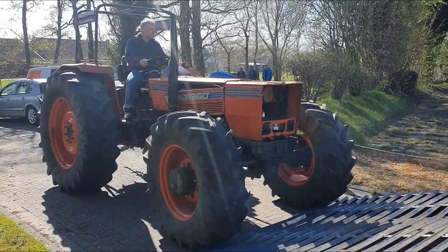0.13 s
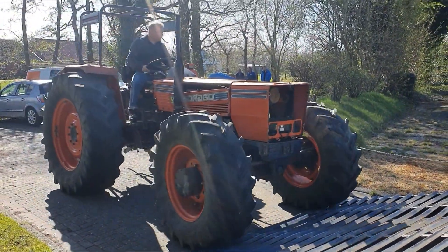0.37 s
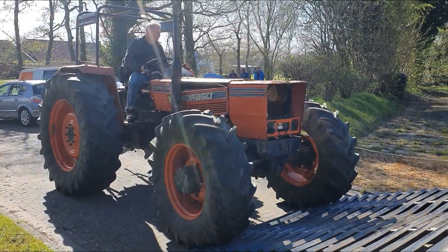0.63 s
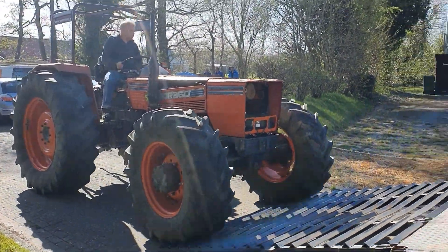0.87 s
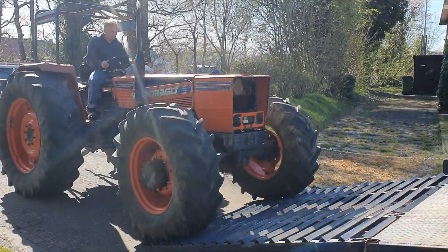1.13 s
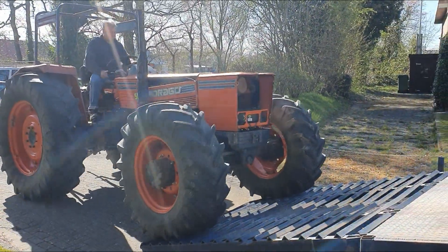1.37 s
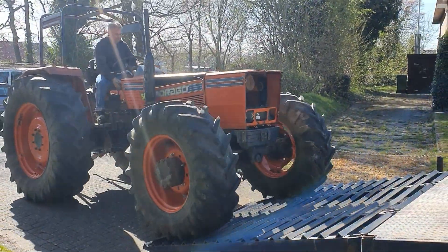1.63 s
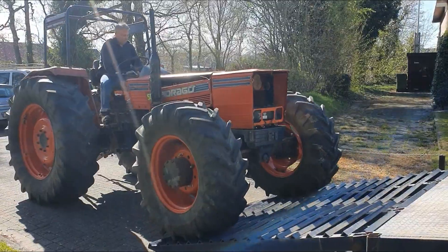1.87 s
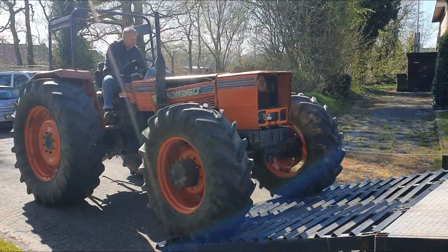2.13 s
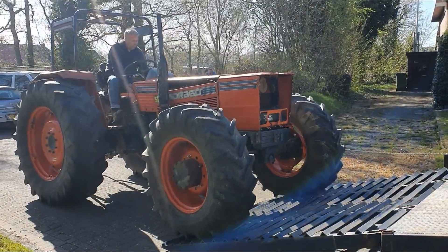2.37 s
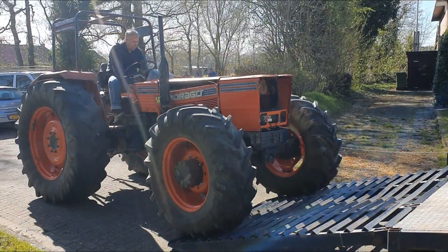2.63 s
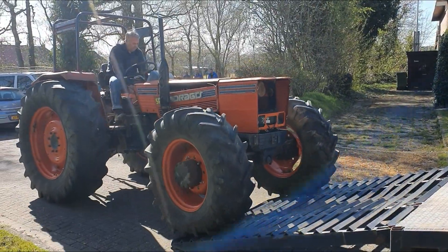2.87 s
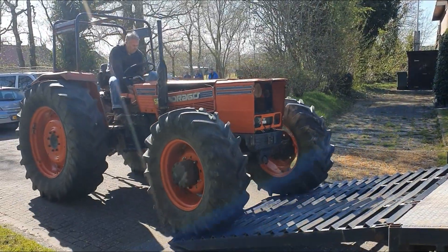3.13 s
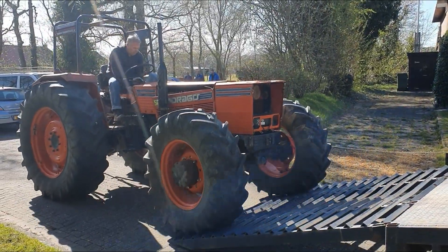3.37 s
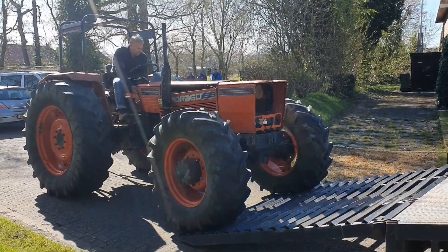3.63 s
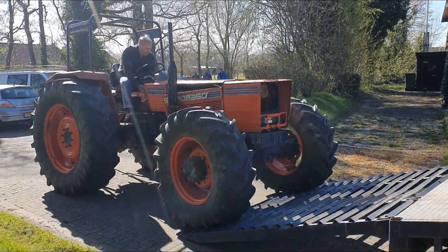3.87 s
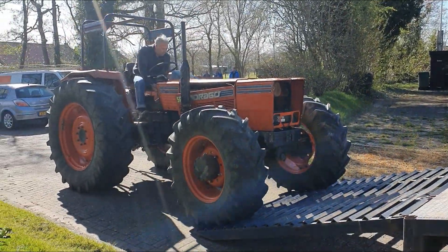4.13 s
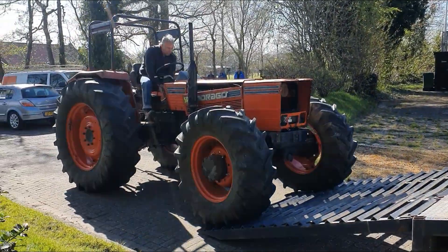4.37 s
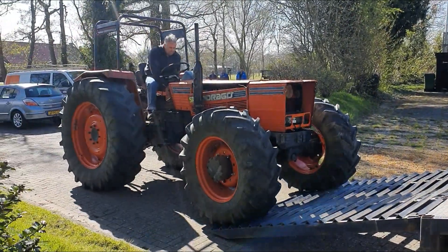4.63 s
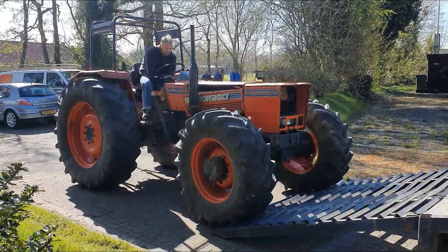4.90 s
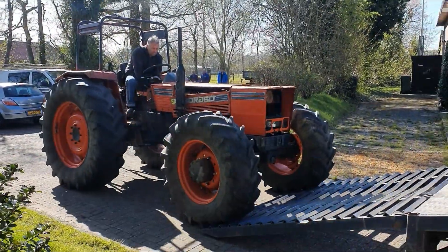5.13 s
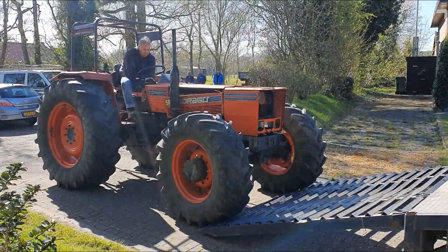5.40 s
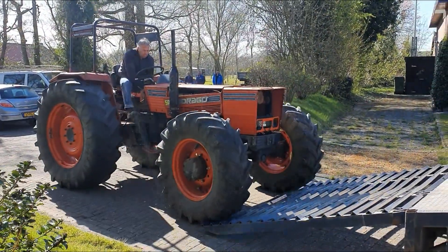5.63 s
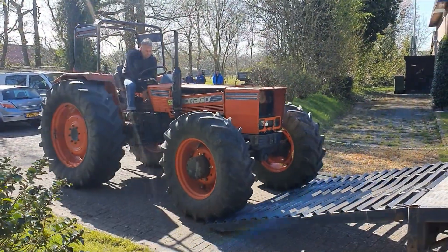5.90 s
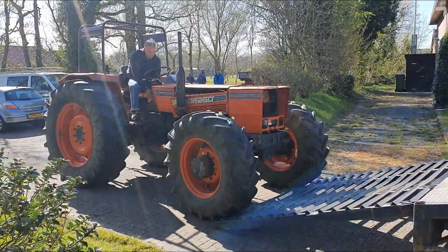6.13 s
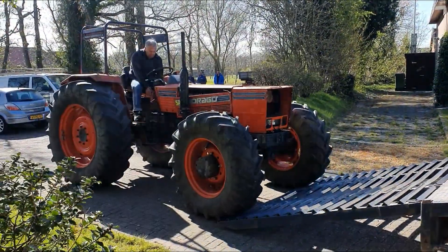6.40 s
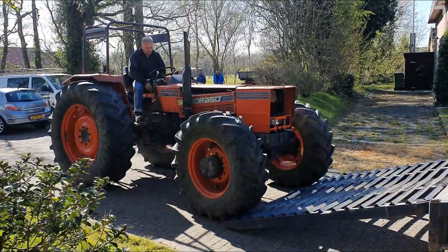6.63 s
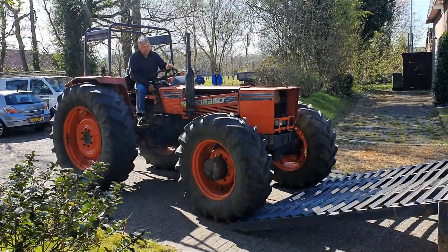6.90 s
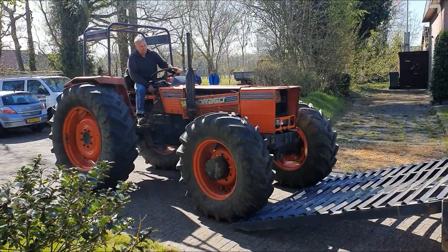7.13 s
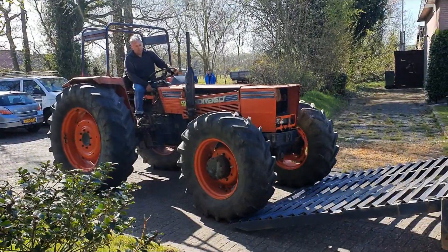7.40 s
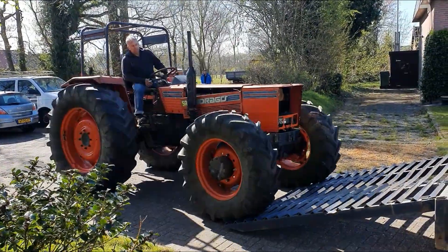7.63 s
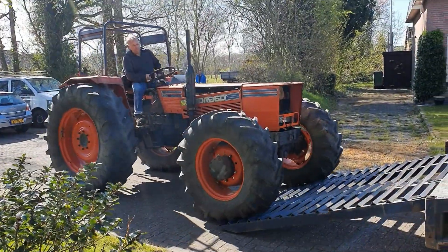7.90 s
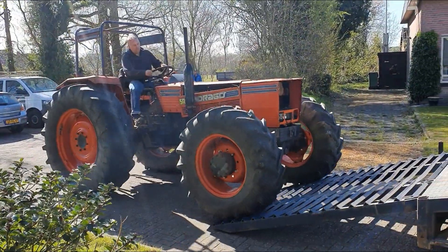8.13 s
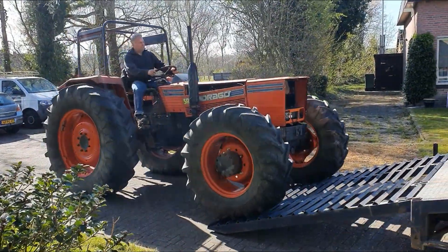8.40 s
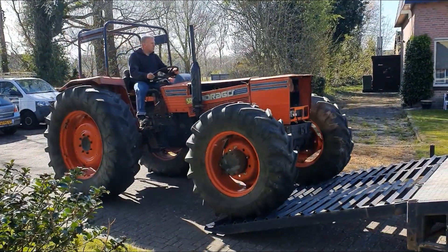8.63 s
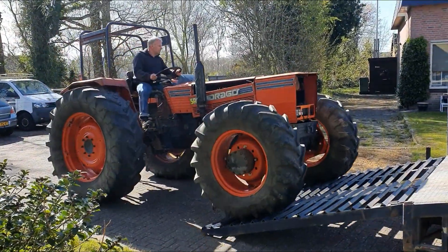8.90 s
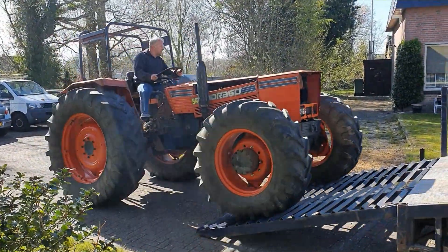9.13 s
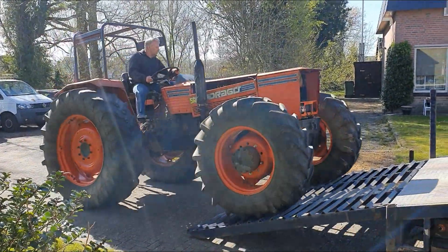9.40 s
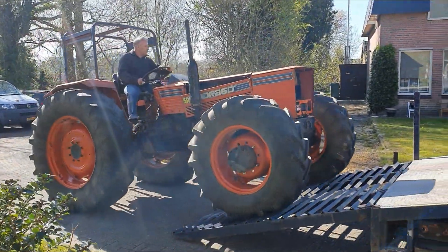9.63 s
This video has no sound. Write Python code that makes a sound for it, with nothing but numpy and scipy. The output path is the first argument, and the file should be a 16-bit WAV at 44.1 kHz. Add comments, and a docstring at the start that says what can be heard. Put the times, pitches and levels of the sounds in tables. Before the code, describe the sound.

A close, rough diesel engine runs throughout in an open yard, dry and without echo. Wind thuds strongly against the microphone early, then only now and then. Revs sag gradually past the middle; sheet metal hums. Around three quarters through, a lug jolts the steel ramp with a quick hard clatter and rustling scrape, and the engine surges, its low exhaust tone growing fuller as the tractor climbs.

```python
"""At a steel ramp in the open, a few metres from a hand-held phone, a six-cylinder diesel tractor idles down,
then pulls up the ramp. Each firing is a noise burst through casting modes, one cylinder harder than the next;
the exhaust booms as sines on the firing rate and its octave, panels hum as wavering tones, valves ring briefly.
Wind buffets the two microphone ports as low noise and single swings; steel blows ring as decaying modes, and
something rustles close by in swells of filtered noise."""
import sys
import numpy as np
from scipy import signal
from scipy.fft import rfft, irfft, next_fast_len
from scipy.io import wavfile
from scipy.ndimage import uniform_filter1d

SR = 44100
rng = np.random.default_rng(int(sys.argv[2]) if len(sys.argv) > 2 else 0)


def dump(signal):
    """Clip the signal to [-1, 1] and save it as 16-bit WAV at the path in sys.argv[1]."""
    limited = np.clip(np.atleast_2d(signal).T, -1, 1)
    pcm = np.round(limited * 32767).astype(np.int16)
    wavfile.write(sys.argv[1], SR, pcm)


def ratio_of_db(decibels):
    """Turn decibels (scalar or array-like) into linear amplitude factors; 0 dB maps to 1."""
    return 10 ** (np.asarray(decibels, float) / 20)


N = 430842
SIZE = next_fast_len(N)
FREQ = np.maximum(np.fft.rfftfreq(SIZE, 1 / SR), 1)
TIME = np.arange(N) / SR


def columns(table):
    """Each column of a curve table, interpolated at every sample."""
    seconds, *values = np.transpose(table)
    return [np.interp(TIME, seconds, value) for value in values]


def over_freq(table):
    """A (Hz, value) table at every frequency bin, interpolated over log frequency."""
    hz, value = np.transpose(table)
    return np.interp(np.log(FREQ), np.log(hz), value)


def shape(x, gain):
    """Filter by a gain per frequency bin, then scale to rms 1."""
    y = irfft(rfft(x, SIZE) * gain, SIZE)[..., :N]
    return y / np.sqrt(np.mean(y ** 2))


def walk(rate):
    """A random curve: normal draws held for 1 / rate seconds, then smoothed twice."""
    hold = int(SR / rate)
    steps = np.repeat(rng.standard_normal(N // hold + 1), hold)
    return uniform_filter1d(uniform_filter1d(steps, hold), hold)[:N]


def swells(rows, rest_db):
    """Level in dB: a resting level with bell-shaped swells (s, dB, length s) added in power."""
    power = ratio_of_db(rest_db) ** 2
    for start, db, length in rows:
        power = power + ratio_of_db(db) ** 2 * np.exp(-((TIME - start) / length) ** 2)
    return 10 * np.log10(power)


def resonance(hz, width):
    """Power gain of one steep resonance; width is nominal, in Hz."""
    return 1 / (1 + ((FREQ - hz * hz / FREQ) / (2.44 * width)) ** 2) ** 2


def modes(power):
    """The causal (minimum-phase) response with this power gain, from the folded cepstrum."""
    cepstrum = irfft(np.log(power) / 2, SIZE)
    cepstrum[1:SIZE // 2] *= 2
    cepstrum[SIZE // 2 + 1:] = 0
    return np.exp(rfft(cepstrum))


# Wind strength between the gusts. Each row: time in seconds, level in dB.
BREEZE = [(0.0, -29), (1.9, -30), (2.5, -34), (3.0, -33), (3.6, -33.5), (4.5, -33), (5.3, -38), (6.5, -40),
          (7.0, -40), (7.7, -33), (8.5, -36), (9.77, -35)]
# Gusts. Each row: centre in seconds, level in dB, length in seconds, left minus right in dB.
GUSTS = [(0.326, -21.5, 0.041, 1), (0.6, -27, 0.048, -5), (0.878, -24, 0.027, 6), (1.09, -25, 0.048, 4),
         (1.352, -19, 0.021, 1), (1.796, -21.5, 0.021, -7), (1.92, -22.5, 0.072, 1),
         (3.535, -25, 0.036, -1), (4.2, -32, 0.013, 0), (6.14, -29.5, .04, 0), (6.747, -32.5, 0.068, 0),
         (6.975, -31, .05, 0), (7.206, -25.5, 0.014, 0), (7.612, -27, 0.084, 5), (8.749, -31, 0.056, -2),
         (9.576, -41, .06, -7)]
# Colour of the turbulence. Each row: frequency in Hz, relative density in dB per Hz.
WIND_COLOUR = [(20, -15), (40, -10), (65, 2), (100, 2.5), (140, -10.5), (250, -15.5), (450, -39),
               (900, -69)]
WIND_SHARED = 0.57  # share of the noise power common to both ports
BREEZE_SHARED_DB, BREEZE_OWN_DB = 3, 3.5  # unsteadiness common to the ports, and of each port, before smoothing


def wind():
    """Low turbulence, partly shared by the ports; it flutters, and strong gusts slap higher."""
    shared, left, right = rng.standard_normal((3, N))
    noise = np.sqrt(WIND_SHARED) * shared + np.sqrt(1 - WIND_SHARED) * np.array([left, right])
    breeze_db = columns(BREEZE)[0] + BREEZE_SHARED_DB * walk(13)
    port_db = []
    for side in (1, -1):
        rows = [(start, db + side * pan_db / 2, length) for start, db, length, pan_db in GUSTS]
        port_db.append(swells(rows, breeze_db + BREEZE_OWN_DB * walk(16)))
    gust_db = np.array(port_db) + 1.83 * walk(30)  # flutter common to both ports
    rumble = ratio_of_db(gust_db) * shape(noise, ratio_of_db(over_freq(WIND_COLOUR)))
    # the slap grows almost twice as fast in dB as the rumble
    slap = ratio_of_db(1.91 * gust_db + 5.5) * shape(noise, np.sqrt(resonance(340, 124)))
    return rumble + slap


# Single slaps of wind. Each row: start in seconds, level in dB, pitch in Hz, left minus right in dB.
BUFFETS = [(0.071, -14, 99.5, 0), (0.238, -13.5, 102, -2), (0.315, -11.5, 72.4, -1.5),
           (0.35, -13.5, 76, -1), (0.5, -23, 74.5, 0), (0.535, -17, 76, -1), (0.791, -20, 77.6, 3),
           (1.195, -13, 76.5, 0), (0.624, -19, 80, -1.5), (0.748, -19, 81.4, 1.5), (0.911, -10.5, 81, -1.5),
           (1.061, -16, 87, -2), (1.15, -13.5, 71.6, 0), (1.323, -14.5, 105, 1), (1.335, -19.5, 200, 0),
           (1.9, -21, 150, 0), (0.245, -19, 165, 2), (1.433, -12, 68.4, 0), (1.489, -13.5, 76, 0),
           (1.56, -19, 101, -2), (1.648, -18, 80, -2.5), (1.799, -11, 60.7, 0), (1.882, -15.5, 64, 1),
           (1.949, -22, 114, 4), (2.03, -21, 63.5, 9), (2.129, -18, 72.7, 1), (2.341, -21, 70.5, -2),
           (3.029, -28, 87.5, -5), (3.167, -27.5, 109, -3.5), (3.512, -19, 86.5, 4),
           (3.631, -21, 69.6, -1.0), (3.77, -16.5, 83, 4), (3.899, -19, 61.9, 2), (4.131, -21, 72, 4),
           (4.42, -25, 90, 2.5), (6.89, -19, 70.4, 0), (7.24, -23, 70, 0), (8.701, -27, 80, 2)]
BUFFET_S, BUFFET_EDGE_DB = 0.042, -8.5  # length; strength of the swing an octave up


def buffets():
    """Single eddies slap the ports: a few soft low swings each."""
    starts = rng.uniform(0, 2 * np.pi, (len(BUFFETS), 2))
    age = np.arange(int(BUFFET_S * SR)) / SR
    envelope = np.sin(np.pi * (age / age[-1]) ** 0.76) ** 2
    out = np.zeros((2, N))
    for (s, db, hz, pan_db), (start, lag) in zip(BUFFETS, starts):
        swing = np.cos(2 * np.pi * hz * age + start + np.array([[0], [0.35 * lag]]))
        swing = swing + ratio_of_db(BUFFET_EDGE_DB) * (2 * swing ** 2 - 1)
        level = ratio_of_db(db + np.array([[pan_db], [-pan_db]]) / 2)
        first = int(s * SR)
        out[:, first:first + len(age)] += swing * envelope * level
    return out


# Rustles, scrapes and short low swells.
# Each row: centre in seconds, level in dB, length in seconds, centre in Hz, bandwidth in Hz (held to 40-20000).
RUSTLES = [(0.36, -45, .05, 4970, 6000), (0.584, -32, 0.02, 5200, 8500), (0.653, -40, 0.065, 5800, 7000),
           (0.86, -37, 0.021, 5100, 7500), (7.377, -30, 0.049, 1530, 1000), (7.33, -40, 0.036, 3400, 1200),
           (7.385, -39, 0.014, 3800, 6000), (7.44, -41, 0.023, 7800, 8100), (5.307, -29.5, 0.18, 168, 71),
           (5.34, -31.5, 0.23, 370, 110), (7.5, -35, 0.09, 263, 250), (6.07, -46.5, 0.014, 8740, 160),
           (8.428, -31, 0.027, 1890, 700)]


def rustles():
    """Short bell-shaped swells of band-passed, grainy noise."""
    grains = rng.standard_normal((2, N)) * ratio_of_db(1.0 * walk(330))
    out = np.zeros((2, N))
    for s, db, length, hz, width in RUSTLES:
        span = slice(max(int((s - 3 * length) * SR), 0), int((s + 3 * length) * SR))
        edges = [max(hz - width / 2, 40), min(hz + width / 2, 20000)]
        sos = signal.butter(2, edges, "band", fs=SR, output="sos")
        hiss = signal.sosfilt(sos, grains[:, span])
        bell = np.exp(-((TIME[span] - s) / length) ** 2)
        out[:, span] += ratio_of_db(db) * bell * hiss / hiss.std()
    return out


# A loose part rattles on the frame. Each row: start in seconds, peak in dB.
RATTLES = [(0.275, -24), (0.288, -24), (0.3, -26), (0.343, -29), (0.58, -29), (0.64, -30)]
# Modes of the loose part. Each row: pitch in Hz, relative level in dB, 60 dB decay in seconds.
RATTLE_MODES = [(700, -1, 0.046), (1260, -1, .07), (1650, -3, .07), (1990, 1, 0.082), (2850, -3, .06),
                (3050, -9, .06), (4700, -11, .05), (5300, -10, .06)]
# A tyre lug jolts the steel ramp. Each row: start in seconds, peak in dB.
CLANKS = [(7.275, -27), (7.308, -24), (7.327, -25), (7.352, -17.5), (7.384, -20), (7.397, -23),
          (7.423, -20.5), (7.456, -26), (8.42, -26)]
# Modes of the ramp. Each row: pitch in Hz, relative level in dB, 60 dB decay in seconds.
RAMP_MODES = [(1220, -2, .08), (1470, 2, .09), (1590, -1, 0.092), (1820, 0, .08), (2155, -5, .08),
              (2390, -8, .07), (3240, -13, .08), (3740, -13, .07), (4090, -12, .07), (4380, -16, .07)]
BLOW_RISE_S, BLOW_SCATTER_DB, BLOW_SPREAD = .002, 4, .025  # attack; mode level scatter; share of the pitch


def blows(rows, table):
    """Each blow rings the decaying modes of one part, landing on another spot every time."""
    hz, db, t60 = np.transpose(table)[:, :, None]
    age = np.arange(SR // 8) / SR
    out = np.zeros((2, N))
    draws = rng.standard_normal((len(rows), 4, len(table), 1))
    for (s, peak_db), (size, pitch, start, lag) in zip(rows, draws):
        turn = 2 * np.pi * (hz * (1 + BLOW_SPREAD * pitch) * age + start)
        fade = ratio_of_db(db + BLOW_SCATTER_DB * size - 60 * age / t60) * (1 - np.exp(-age / BLOW_RISE_S))
        ring = (fade * np.sin([turn, turn + 0.99 * lag])).sum(axis=1)
        first = int(s * SR)
        out[:, first:first + len(age)] += ratio_of_db(peak_db) * ring / np.abs(ring).max()
    return out


RING_STEADY = .8  # steady part of a driven panel against its random part


def ringing(hz, waver_hz):
    """Sheet metal shaken at random by the engine: a narrow tone of rms near 1 that beats, breaks and wanders."""
    turn = np.exp(2j * np.pi * np.cumsum(hz + waver_hz / 2 * walk(20)) / SR)
    sway = RING_STEADY + walk(6 * waver_hz) + 1j * walk(6 * waver_hz)
    ports = np.exp(1j * np.array([0 * TIME, 0.82 + 0.98 * walk(8)]))  # wandering phase between the ports
    return 1.04 * (sway * turn * ports).imag


# Side panels ring on one narrow mode while they face the phone.
# Each row: centre in seconds, level in dB, length in seconds, pitch in Hz, glide in Hz per second.
PANEL_RINGS = [(0.92, -33, 0.45, 592, 0), (0.9, -34.5, 0.58, 738, -9), (0.99, -39, 0.25, 808, 0),
               (3.57, -38, 0.78, 682, -0.5), (1.4, -38.5, 0.3, 770, 0), (0.88, -37, 0.56, 882, 0),
               (3.64, -39.5, 0.65, 750, 0), (4, -38.5, 0.94, 895, 0), (3.09, -40.5, 1.16, 630, 0.5),
               (4.35, -46, 0.22, 1203, 1), (5.94, -41.5, 0.59, 1180, -1), (6.95, -40, 0.44, 1200, 0),
               (6.14, -42, 0.4, 845, -1.5), (7.1, -36.5, .45, 668, -0.5), (8.85, -42, .2, 630, 0.5),
               (9.55, -35.5, .2, 684, -1), (4.7, -46.5, 1.9, 370, 0)]
PANEL_WAVER_HZ = 6


def panels():
    """Narrow panel modes, each swelling as it turns towards the phone."""
    out = 0
    for s, db, length, hz, glide in PANEL_RINGS:
        bell = np.exp(-.5 * ((TIME - s) / length) ** 2)
        out = out + ratio_of_db(db) * bell * ringing(hz + glide * (TIME - s), PANEL_WAVER_HZ)
    return out


# Bonnet mode, sagging as the frame twists. Each row: time in seconds, pitch in Hz.
BONNET = [(0, 636), (5.3, 630), (6.4, 627.3), (7.0, 637), (7.5, 621.5), (8.1, 613), (9.77, 634)]
# The hum swells now and then. Each row: centre in seconds, level in dB before facing, length in seconds.
HUM_SWELLS = [(2.28, -23, 0.032), (5.1, -28, 0.035), (5.36, -26.5, 0.084), (6.05, -30, 0.067),
              (6.42, -25, 0.15), (6.92, -28.5, 0.16), (7.52, -34, 0.14), (7.95, -29.5, 0.1),
              (9.06, -41, 0.041)]
HUM_REST_DB, BONNET_WAVER_HZ = -35, 11  # level between swells, before facing; pitch waver


def bonnet():
    """The bonnet hums on one mode; it faces the phone fully only once the tractor has turned."""
    facing_db = np.interp(TIME, (3.5, 5.0), (-9, 0))
    level = ratio_of_db(swells(HUM_SWELLS, HUM_REST_DB) + facing_db)
    return level * ringing(columns(BONNET)[0], BONNET_WAVER_HZ)


# Short rings of knocks and valve gear.
# Each row: mean pitch in Hz, pitch spread in Hz, level in dB before scatter, decay constant in seconds.
VALVE_RINGS = [(780, 80, -31, .02), (1220, 70, -38, .016), (1600, 150, -35, .014), (2030, 100, -38, .013),
               (3240, 110, -38.5, .017), (3430, 110, -38.5, .016), (3680, 110, -39, .015),
               (4350, 120, -46.5, .014), (4720, 100, -46, .014), (5250, 150, -48, .012)]
# The valve cover turns away on the ramp. Each row: time in seconds, gain in dB.
VALVES_FACING = [(0, 0), (8.0, 0.5), (9.77, -3.5)]
VALVE_SCATTER_DB, VALVE_ROUGH_DB = 3, 4.5  # from firing to firing; fast flutter before smoothing
VALVE_RISE_S, VALVE_PAN_DB = .006, -3.5  # attack constant; left minus right


def valves(firings, rate):
    """One short ring per firing and part, with its own pitch, strength and lag between the ports."""
    count, age = firings.astype(int), firings % 1 / rate
    out = 0
    for hz, spread_hz, db, decay in VALVE_RINGS:
        pitch, size, lag = rng.standard_normal((count.max() + 1, 3))[count].T
        # the cylinder pattern of the block part that holds this pitch
        cylinders = next(np.array(row[2]) for row in KNOCK if hz < row[0])
        size_db = VALVE_SCATTER_DB * size + (cylinders - cylinders.mean())[count % 6]
        level = ratio_of_db(db + size_db + VALVE_ROUGH_DB * walk(400))
        ring = level * (1 - np.exp(-age / VALVE_RISE_S)) * np.exp(-age / decay)
        turn = 2 * np.pi * (hz + spread_hz * pitch) * age
        pan = ratio_of_db([[VALVE_PAN_DB / 2], [-VALVE_PAN_DB / 2]])
        out = out + ring * np.sin([turn, turn + 1.48 * lag]) * pan
    return ratio_of_db(columns(VALVES_FACING)[0]) * out


# Exhaust boom, growing with the load. Each row: time in seconds, firing tone in dB, octave tone in dB.
EXHAUST = [(0.0, -28, -38), (0.36, -46, -24.5), (0.7, -38, -33.5), (1.2, -40, -26.5), (1.9, -38, -32.5),
           (2.8, -56, -55), (4.0, -40, -50), (5.4, -40, -35.5), (6.15, -41, -33), (6.55, -41, -32.5),
           (6.92, -39, -23.5), (7.06, -42, -39), (7.16, -38, -29), (7.3, -36, -29), (7.36, -31, -19),
           (7.45, -31, -19.5), (7.5, -33, -25.5), (7.6, -30, -27.5), (8.0, -31, -24), (8.5, -24, -23.5),
           (8.85, -27.5, -23.5), (9.2, -35, -26.5), (9.45, -28, -24), (9.77, -29, -24)]
# Weaker exhaust orders. Each row: order in sixths of the firing rate, level in dB relative to the octave tone.
ORDERS_DB = [(9, -22), (10, -24), (11, -20), (13, -21), (14, -20), (15, -15), (18, -18), (24, -20),
             (27, -21), (30, -15), (33, -21), (36, -17), (38, -19), (40, -18), (42, -19), (45, -20)]
BOOM_WAVER_DB, ORDER_WAVER_DB = (1.5, 1.8), 3  # before smoothing: (firing tone, octave tone); each order


def exhaust(firings):
    """Clean tones from the pipe, wavering in level; uneven cylinders add weaker orders between and above them."""
    tone_db, octave_db = (db + waver_db * walk(11) for db, waver_db in zip(columns(EXHAUST), BOOM_WAVER_DB))
    turn = 2 * np.pi * firings
    upper = 0
    for sixths, db in ORDERS_DB:
        upper = upper + ratio_of_db(db + ORDER_WAVER_DB * walk(9)) * np.cos(sixths / 6 * turn + sixths)
    firing_tone = ratio_of_db(tone_db) * np.cos(turn - 1.18)
    octave_and_orders = ratio_of_db(octave_db) * (np.cos(2 * turn - 1.94) + upper)
    return np.sqrt(2) * (firing_tone + octave_and_orders) * np.array([[.95], [1.05]])


# What the two ports share. Each row: frequency in Hz, likeness (held to 0-1).
LIKENESS = [(60, 2), (300, 0.9), (700, 0.78), (1200, 0.63), (1700, .5), (2500, 0.4), (3800, -0.1),
            (4600, 0.5), (6000, 0.05), (12000, -0.5)]
# Phase between the ports. Each row: frequency in Hz, lead of the left in radians.
LEAD = [(60, 0), (430, -.7), (1200, -.7), (1550, -1.7), (1980, -.4), (2300, -1.2), (3000, -.3), (3600, -.8),
        (4050, -2.8), (4400, -4.8), (6000, -6.5)]
# Balance of the ports. Each row: frequency in Hz, left minus right in dB.
BALANCE_DB = [(60, -1), (110, 8), (190, 0.5), (350, -0.5), (630, -0.5), (1130, -1), (2020, -2.5),
              (3640, -4.5), (6540, -5), (11800, 1)]


def at_ports(paths):
    """Three spectra (direct, scattered left, scattered right) as two ports hear them."""
    like = np.clip(over_freq(LIKENESS), 0, 1)
    side = np.array([[1], [-1]])
    direct = paths[0] * np.exp(.5j * side * over_freq(LEAD))
    mixed = np.sqrt(like) * direct + np.sqrt(1 - like) * paths[1:]
    return mixed * ratio_of_db(side * over_freq(BALANCE_DB) / 2)


# Parts of the block that answer the knock.
# Each row: upper edge in Hz, knock over roar in dB, offsets of the six cylinders in dB.
KNOCK = [(1014, -5, (-0.65, 0.1, -0.5, 0.92, 0.16, -0.5)), (1432, -6.5, (7, 6.4, 7.9, 4.1, 5.7, 2.6)),
         (1963, -3.5, (-10, 1.5, 3.5, -2, 5, 0.5)), (2870, -10.5, (11, 9.5, 9.9, 8.3, 6, 5)),
         (3120, -3, (7.5, -8, 3, 8.5, -3, 7)), (4350, 0, (3, 2.5, -1.5, -1.5, -2, -0.5)),
         (6450, -2.5, (4, 1.5, 1, 2.5, -2.5, 0.2)), (22050, -10, (9.5, 6.1, 4.1, 7.1, 4.8, 10.5))]
KNOCK_RISE, KNOCK_FALL = .35, .45  # shares of a firing interval
KNOCK_SCATTER_DB, ROAR_FLICKER_DB = 1.8, 2.5  # from firing to firing; flicker before smoothing
KNOCK_REPEAT = .2  # share of the knock's power that repeats each cycle


def block(firings, rate):
    """A flickering roar plus a burst at every firing; each part of the block favours other cylinders."""
    count, phase = firings.astype(int), firings % 1
    burst = (1 - np.exp(-phase / KNOCK_RISE)) ** 2 * np.exp(-phase / KNOCK_FALL)
    burst = burst / np.sqrt(np.mean(burst ** 2))
    roar, fresh = rng.standard_normal((2, 3, N))
    # the same parts strike in the same order, so a cylinder's knock partly repeats each cycle
    since_firing = (phase / rate * SR).astype(int)
    habit = rng.standard_normal((3, 6, SR // 20))[:, count % 6, since_firing]
    knock = burst * (np.sqrt(KNOCK_REPEAT) * habit + np.sqrt(1 - KNOCK_REPEAT) * fresh)
    scatter = rng.standard_normal((count.max() + 2, len(KNOCK)))
    paths, low_hz = 0, 0
    for part, (high_hz, knock_db, cylinders) in enumerate(KNOCK):
        size = ratio_of_db(knock_db + np.array(cylinders)[count % 6] + KNOCK_SCATTER_DB * scatter[count, part])
        force = ratio_of_db(ROAR_FLICKER_DB * walk(10)) * roar + size * knock
        band = (FREQ >= low_hz) & (FREQ < high_hz)
        paths = paths + band * rfft(force / force.std(), SIZE)
        low_hz = high_hz
    return at_ports(paths)


# Engine body as the distance changes. Each row: time in seconds, gain in dB.
BODY = [(0.0, 2), (0.9, 1.5), (1.5, 0.5), (2.7, -0.5), (3.5, 1), (5.5, 0.3), (6.3, 0.9), (7.2, -1),
        (7.4, 1), (8.0, 1.5), (9.1, 2), (9.77, 1.5)]
# What the block radiates between its modes, through the phone's ports. Each row: frequency in Hz, gain in dB.
BETWEEN_MODES = [(60, -20.5), (130, -51), (450, -21), (750, -20), (1350, -21.5), (1900, -26.5), (2700, -35),
                 (4000, -35), (5700, -40), (6900, -46.5), (7450, -53), (8100, -46.5), (8900, -43),
                 (10300, -46.5), (10900, -54), (11400, -62), (12300, -73)]
# Times in seconds of the three stages: rolling in, idling, climbing the ramp.
STAGES = [.8, 4.8, 8.8]
# Modes of castings and panels.
# Each row: pitch in Hz, nominal width in Hz, gains in dB rolling in, idling and climbing.
CASTING_MODES = [(172.5, 57, -13.5, -15.5, -16.5), (278, 30, -18, -21.5, -11), (333, 42, -14, -13.5, -16),
                 (589.6, 25.4, -10, -11.5, -13), (678, 17.3, -9, -8, -8.5), (726, 17, -10.5, -28, -10),
                 (795, 28.5, -12, -10.5, -16), (874, 48, -15, -13, -14.5), (1190, 9.9, -14.5, -12, -24),
                 (1510, 69, -19.5, -22, -28), (1680, 94, -41, -24, -18.5), (2042, 24, -18, -20.5, -44),
                 (2100, 280, -29, -27, -45), (3080, 39, -46, -26.5, -34), (3330, 180, -34, -30, -31.5),
                 (3440, 86, -29.5, -34, -43), (3830, 120, -31, -30.5, -36), (4230, 48, -32, -27, -50),
                 (4700, 390, -36.5, -39.5, -64), (5310, 190, -36.5, -35, -47)]


def engine(firings, rate):
    """The block's forces ring castings and sheet metal; other modes face the phone as the tractor moves."""
    drive = block(firings, rate)
    peaks = np.array([resonance(hz, width) for hz, width, *_ in CASTING_MODES])
    floor = ratio_of_db(over_freq(BETWEEN_MODES)) ** 2
    body = 0
    for stage, weight in enumerate(np.eye(len(STAGES))):
        facing = ratio_of_db([row[2 + stage] for row in CASTING_MODES]) ** 2
        gain = modes(floor + facing @ peaks)
        crossfade = np.interp(TIME, STAGES, weight)
        body = body + crossfade * irfft(drive * gain, SIZE)[:, :N]
    return ratio_of_db(columns(BODY)[0]) * body


# Engine speed. Each row: time in seconds, firings per second in Hz.
SPEED = [(0.0, 36.8), (0.6, 38.23), (1.2, 37.79), (1.8, 37.61), (2.4, 36.8), (3.0, 35.51), (3.6, 35.2),
         (4.2, 34.34), (4.8, 33.74), (5.4, 32.44), (6.0, 32.34), (6.5, 31.94), (6.85, 33.88), (7.1, 34.43),
         (7.3, 35.27), (7.5, 40.15), (7.75, 40.31), (8.0, 39.44), (8.25, 43.46), (8.5, 43.78),
         (8.75, 45.79), (9.0, 44.81), (9.3, 43.19), (9.77, 44.36)]
FIRST_FIRING = .52  # share of a firing interval already gone at the start


def scene():
    """Wind and rustles, blows on steel, then the tractor: panels, valves, exhaust and engine on one firing clock."""
    rate = columns(SPEED)[0]
    firings = np.cumsum(rate) / SR + FIRST_FIRING
    surroundings = wind() + buffets() + rustles()
    steel = blows(RATTLES, RATTLE_MODES) + blows(CLANKS, RAMP_MODES)
    sheet_metal = panels() + bonnet()
    tractor = sheet_metal + valves(firings, rate) + exhaust(firings) + engine(firings, rate)
    return surroundings + steel + tractor


def low_pass(x):
    """Removes everything above the highest recorded frequency."""
    return signal.sosfilt(signal.butter(12, 12350, fs=SR, output="sos"), x)


def record(dry):
    """The microphone rounds the loudest slaps towards a soft ceiling."""
    soft_top = 0.9
    mix = soft_top * np.tanh(dry / soft_top)
    return low_pass(mix)


dry = scene()
out = record(dry)
dump(out)
```